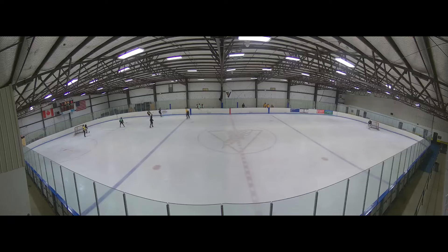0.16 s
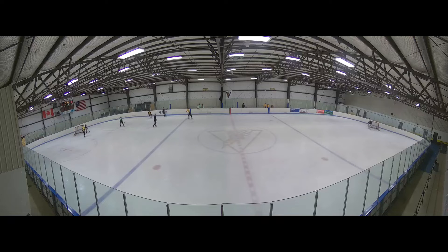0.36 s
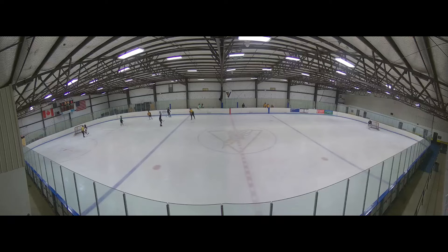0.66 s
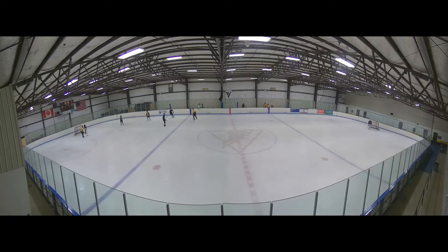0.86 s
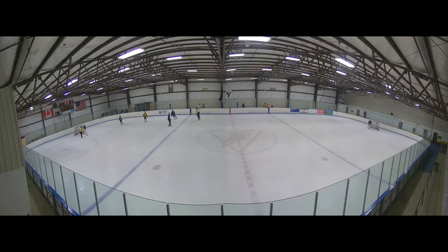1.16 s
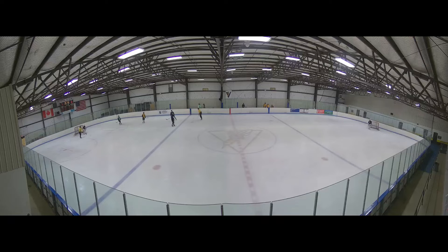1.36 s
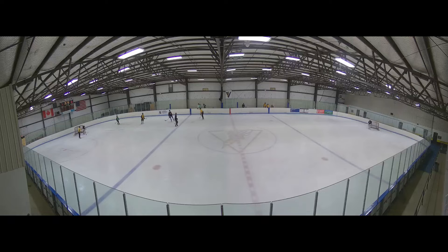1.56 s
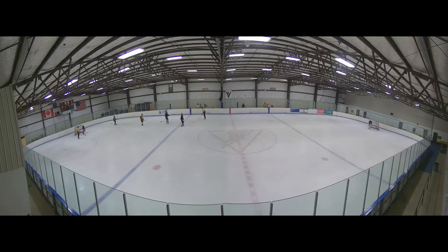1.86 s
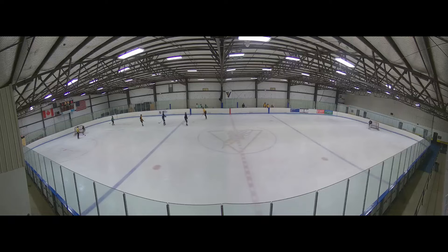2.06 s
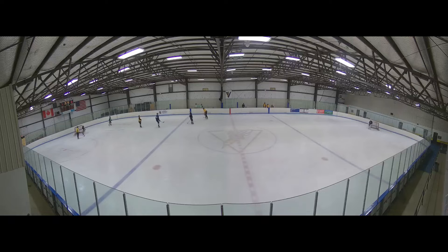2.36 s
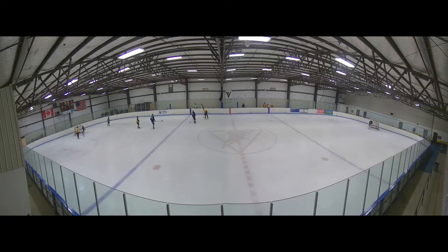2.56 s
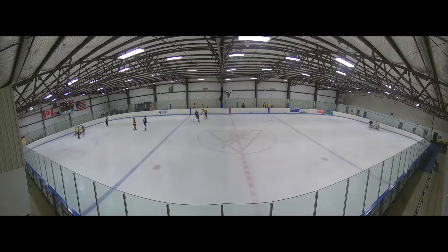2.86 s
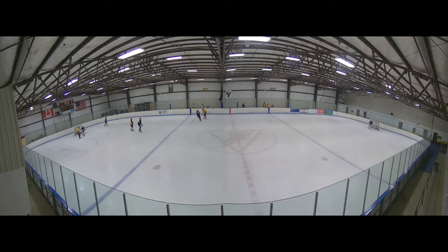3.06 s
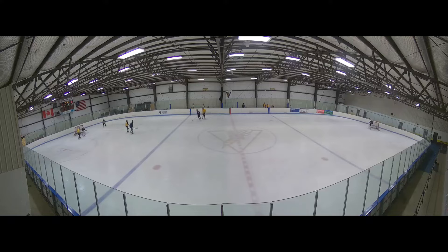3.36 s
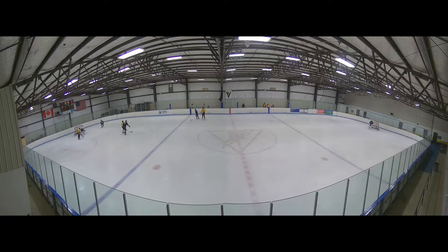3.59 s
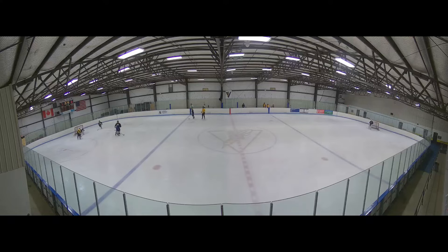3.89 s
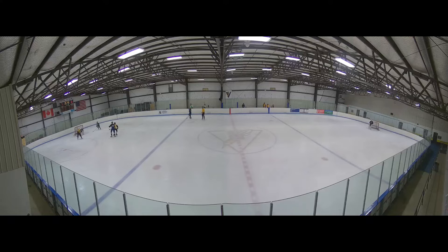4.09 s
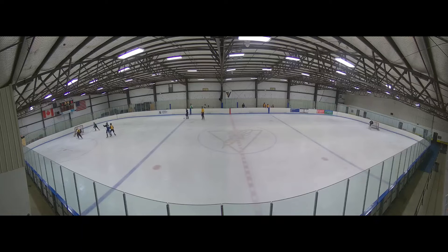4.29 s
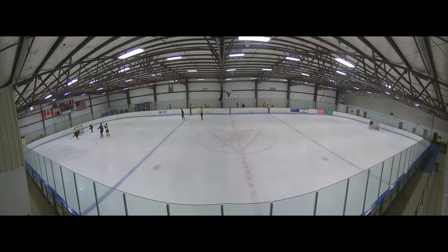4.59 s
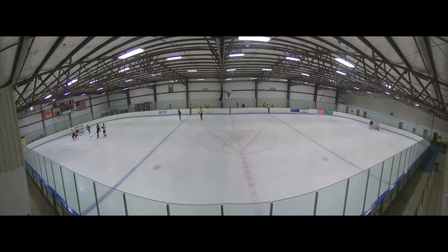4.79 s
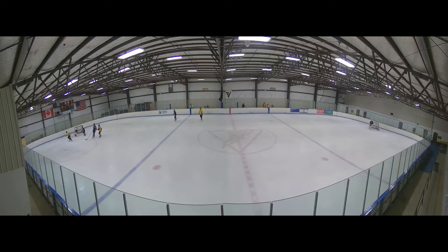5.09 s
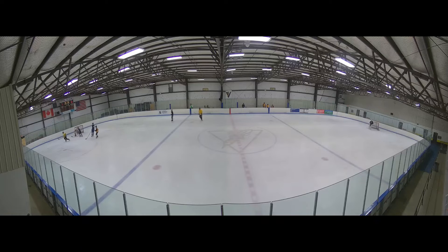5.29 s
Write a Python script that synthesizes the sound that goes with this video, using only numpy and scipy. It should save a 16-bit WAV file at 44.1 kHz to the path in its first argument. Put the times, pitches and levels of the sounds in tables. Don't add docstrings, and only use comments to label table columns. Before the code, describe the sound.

A distant camera microphone hears hockey play in a large, very reverberant indoor rink. Low ventilation rumble, faint hum and soft hiss run throughout. A short crack opens the clip, with lighter taps at about 0.4 and 0.5 seconds. A harder ringing knock lands at 0.8, echoing off boards and glass. A bright tick at 1.2 precedes a sharp crack at 1.3 with a flurry of slap echoes and a crunchy skate dig around 1.4. Smaller knocks follow at 1.9, 2.05, 2.4 and 2.6, with faint blade scraping. At 2.8 a heavy, broad bang booms off the boards, and its long tail fades through a quieter stretch until about 4.4. Faint taps and soft skate scrapes return, brightest near 4.9, then a light tap at 5.1 and a loud, abrupt crack at 5.27 near the end. Treble is dull, slightly grainy, and dips briefly around hits.

```python
import sys
import numpy as np
from scipy import signal
from scipy.fft import dct
from scipy.io import wavfile
from scipy.ndimage import uniform_filter1d

SR = 44100
rng = np.random.default_rng(int(sys.argv[2]) if len(sys.argv) > 2 else 0)


def invert_db(level):
    return 10 ** (np.asarray(level, dtype=float) / 20)


def bounce(signal):
    frames = np.transpose(np.atleast_2d(signal))
    limited = np.clip(frames, -1, 1)
    pcm = np.round(limited * 32767).astype(np.int16)
    wavfile.write(sys.argv[1], SR, pcm)


N = 239897
STEP = 32

# (time [s], peak level [dB], crack [Hz], width [octaves], hall tail level [dB])
BLOWS = [(.001, -17.5, 1308, 2.44, -45.5), (.363, -20.5, 2196, 1.1, -46), (.471, -25, 1240, 1.72, -46.5),
         (0.791, -15, 1450, 1.55, -30.5), (1.3291, -14.5, 2930, 2.57, -34.5), (1.884, -21, 2283, 1.2, -45),
         (2.047, -17, 1286, 1.9, -33.5), (2.388, -21.5, 1880, 1.34, -45), (2.587, -24, 1485, 1.5, -49.5),
         (2.798, -7, 918, 4.4, -23.5), (4.409, -30, 900, 1.12, -56), (4.531, -25.5, 1377, 1.8, -52.5),
         (5.135, -25, 1514, 2.16, -46.5), (5.2688, -5.2, 1896, 1.35, -32)]
# (time [s], peak level [dB], crack [Hz])
SLAPS = [(0.021, -26, 1180), (0.8105, -14.5, 2250), (0.811, -19, 800), (0.823, -17, 1200),
         (0.849, -20, 1480), (0.891, -16, 651), (0.901, -18, 1700), (1.003, -18, 1550), (1.332, -17, 1100),
         (1.36, -19, 2390), (1.378, -14, 2350), (1.388, -13, 2390), (1.394, -16, 2790), (1.404, -16, 2470),
         (1.421, -21, 1270), (2.06, -16.5, 1150), (2.114, -16, 1420), (2.129, -17, 1420),
         (2.771, -21.5, 1070), (2.7995, -9, 900), (2.805, -11, 1300), (2.812, -14, 800), (2.847, -16, 1090),
         (2.867, -11, 600), (2.882, -17, 1500), (4.879, -26, 1970), (4.959, -25, 1350), (5.271, -15, 3100),
         (5.282, -18, 2240)]
# (time [s], peak level [dB], crack [Hz], width [octaves])
BRIGHT_TICK = (1.2, -13, 5600, 2)
# (time [s], rms level [dB], centre [Hz], width [octaves], T60 [s])
CLUSTERS = [(0.796, -35.5, 1520, 0.3, 3.14), (0.8, -39, 2500, 0.8, 2.5), (0.81, -40, 1230, .3, 1.5),
            (.89, -38.5, 662, 0.36, 0.25), (1.36, -33, 2780, 1, 0.61), (2.8, -30.5, 520, 1.1, 1.5),
            (2.8, -35, 5300, .8, 0.95), (2.8, -34.5, 151, 0.88, 1.2), (5.271, -28.5, 1900, 1.55, 0.33),
            (5.271, -33, 2250, .3, .6), (5.271, -35, 900, .4, .4), (5.27, -42, 6000, .3, .3),
            (5.274, -41.5, 400, 0.56, 0.65)]
# (peak time [s], level [dB], rise [s per 10 dB], fall [s per 10 dB], brightness [dB/octave])
SKATES = [
    (0, -46.5, 0, .5, -8),
    (.4, -51, .5, 0.06, 4.5),
    (1.39, -29, 0.05, .07, .5),
    (1.52, -36, 0.34, 0.25, 2.5),
    (2.25, -43.5, 0.65, 0.2, .6),
    (2.6, -42, 0.15, 0.06, 1.1),
    (4.74, -43.5, .17, 0.26, .4),
    (4.88, -38.5, 0.06, 0.14, 0.8),
    (5.14, -46.5, 0.7, 0.5, -2),
]
# (frequency [Hz], density [dB per Hz])
BLADE = [(300, -25.5), (600, -6), (1200, 9.5), (2400, 5), (3500, -0.5), (5000, -16.5), (7500, -17)]
# (frequency [Hz], T60 [s])
HALL_T60 = [(100, 2.3), (300, 6.2), (800, 3.11), (2000, 2.07), (4000, 2.74), (7000, 1.21)]
# (frequency [Hz], level [dB])
HALL_COLOUR = [(100, 4.5), (300, 6), (800, 2.5), (2000, 0.66), (4000, -2.5), (7000, 5)]
# (frequency [Hz], density [dB per Hz])
AIR = [(20, 0.2), (45, -9.5), (120, -15), (200, -11.5), (350, -25), (600, -18.5), (2100, -27), (3300, -38)]
# (frequency [Hz], rms level [dB])
HUM = [(118.4, -54)]
# (start [s], end [s], cut [Hz], loss above it [dB])
DROPOUTS = [(.735, .845, 4800, -40), (1.298, 1.322, 2800, -30), (2.772, 2.788, 2100, -50),
            (2.788, 2.794, 600, -30), (2.952, 2.97, 10, -6), (5.2, 5.256, 4300, -40),
            (5.262, 5.274, 3750, -6)]
BLINKS = [.526, 3.895, 4.283, 4.687, 5.029, 5.071, 5.114]
# (frequency [Hz], step [share of local rms])
COARSENESS = [(100, .8), (600, 1.2), (1500, 1.5), (3000, 2.1), (4500, 3.0), (6000, 3.9), (7200, 4.6)]

RATTLE = .05
BOOM_HZ, BOOM_OCTAVES = 227, 2.8
BOOM_DB, BOOM_DB_PER_OCTAVE, HEAVY_OCTAVES = -33, 9, 2.6
SLAP_OCTAVES = .7
GLIDE_DB = -60
AIR_DB = -43
FRAME, FIRST = 2822, 573
SHORT_BEFORE_S, SHORT_AFTER_S = .01, .018
BLINK_S, BLINK_HZ, BLINK_DB = .009, 2700, -13
CUTOFF_HZ = 8170


def rms_one(x):
    return x / np.sqrt(np.mean(x ** 2) + 1e-20)


def at_hz(points, hz):
    table_hz, values = np.transpose(points)
    return np.interp(np.log(hz + 1e-9), np.log(table_hz), values)


def smooth(control):
    return np.interp(np.arange(N) / STEP, np.arange(len(control)), control)


def drift(rate_hz):
    r = np.exp(-2 * np.pi * STEP * rate_hz / SR)
    noise = rng.standard_normal(N // STEP + 2001)
    return rms_one(signal.lfilter([1], [1, -2 * r, r * r], noise)[2000:])


def band(x, hz, octaves):
    half = 2 ** (np.clip(octaves, .15, 4) / 2)
    edges = [hz / half, min(hz * half, .45 * SR)]
    return signal.sosfilt(signal.butter(2, edges, "band", fs=SR, output="sos"), x)


def bank(sources, gain_db, first=0):
    out = np.zeros(N)
    centres = 20 * 2 ** np.arange(0, 8.8, .5)
    for k, hz in enumerate(centres[first:]):
        out += smooth(invert_db(gain_db(hz))) * band(sources[k % 2], hz, 0.45)
    return out


def add(track, s, sound):
    at = max(round(s * SR), 0)
    track[at:at + len(sound)] += sound[:N - at]


def crack(hz, octaves, rattle, t60, noise):
    push = rattle * noise * invert_db(-60 * np.arange(len(noise)) / SR / t60) + 1e-18
    push[0] = -1
    pulse = band(band(push, hz, octaves), hz, octaves + 1.2)
    return pulse / np.max(np.abs(pulse))


def blows():
    direct, send = np.zeros(N), np.zeros(N)
    noises = rng.standard_normal((len(BLOWS), 2048))
    for (s, peak_db, hz, octaves, hall_db), noise in zip(BLOWS, noises):
        weight = min(octaves, HEAVY_OCTAVES)
        add(direct, s, invert_db(peak_db) * crack(hz, weight, RATTLE, .03, noise))
        boom_db = hall_db + BOOM_DB + BOOM_DB_PER_OCTAVE * weight
        boom = invert_db(boom_db) * rms_one(crack(BOOM_HZ, BOOM_OCTAVES, .008, .02, noise))
        add(direct, s, 0.19 * boom)
        hall_crack = rms_one(crack(hz, octaves + 0.98, RATTLE / 2, .005, noise))
        add(send, s, invert_db(hall_db) * hall_crack + boom)
    return direct, send


def slaps():
    rows = [(*slap, SLAP_OCTAVES) for slap in SLAPS] + [BRIGHT_TICK]
    out, noises = np.zeros(N), rng.standard_normal((len(rows), 1024))
    for (s, peak_db, hz, octaves), noise in zip(rows, noises):
        add(out, s + .0005, invert_db(peak_db - 3) * crack(hz, octaves, .2, .012, noise))
    return out


def clusters():
    out, t = np.zeros(N), np.arange(SR) / SR
    noises = rng.standard_normal((len(CLUSTERS), SR))
    for (s, level_db, hz, octaves, t60), noise in zip(CLUSTERS, noises):
        envelope = invert_db(level_db - 60 * t / t60) * (1 - np.exp(-t / 0.003))
        add(out, s, rms_one(band(noise, hz, octaves)) * envelope)
    return out


def skates():
    s, peak_db, rise_s, fall_s, bright_db = np.transpose(SKATES)[:, :, None]
    t = np.arange(0, N, STEP) / SR - s
    fade = np.where(t < 0, -t / rise_s, t / fall_s)
    power = invert_db(2 * (peak_db - 10 * fade))
    total = power.sum(axis=0) + invert_db(2 * GLIDE_DB)
    tilt_db = (power * bright_db).sum(axis=0) / total
    chips = rng.standard_normal((2, N)) * invert_db(3.0 * np.minimum(rng.exponential(1, N), 5))
    hiss = bank(chips, lambda hz: at_hz(BLADE, hz) + tilt_db * np.log2(hz / 2000), first=6)
    flutter = invert_db(1.5 * drift(25)[:len(total)])
    return smooth(np.sqrt(total) * flutter) * rms_one(hiss)


def hall(x):
    t = np.arange(N // STEP + 1) * STEP / SR
    lumps_db = 1.5 * drift(40) * np.exp(-t / .2)
    early = invert_db(lumps_db + 1.7 * np.exp(-t / 0.15)) * (1 - np.exp(-t / .008))
    noise = rng.standard_normal((2, N)) * smooth(early)
    tail = bank(noise, lambda hz: at_hz(HALL_COLOUR, hz) - 60 * t / at_hz(HALL_T60, hz), first=4)
    return signal.fftconvolve(x, tail / np.sqrt(np.sum(tail ** 2)))[:N]


def ventilation():
    noise, t = rng.standard_normal((2, N)), np.arange(N) / SR
    hum = np.zeros(N)
    for hz, level_db in HUM:
        hum += smooth(invert_db(level_db + 2.6 * drift(2.6))) * np.sin(2 * np.pi * hz * t)
    air = bank(noise, lambda hz: at_hz(AIR, hz) + 2.1 * drift(7.8))
    return hum + invert_db(AIR_DB) * rms_one(air)


def scene():
    direct, send = blows()
    scrape = skates()
    near = direct + slaps() + clusters() + scrape
    return (near + hall(send + invert_db(-3.5) * scrape) + ventilation())[None]


def coarse_spectrum(x, size, coarse, top_hz):
    count, half = N // FRAME * FRAME // size + 3 * FRAME // size, size // 2
    padded = np.pad(x, (size + FRAME - FIRST, (count + 2) * size))
    window = np.sin(np.pi * (np.arange(2 * size) + .5) / (2 * size))
    frames = padded[np.arange(count)[:, None] * size + np.arange(2 * size)] * window
    a, b, c, d = np.split(frames, 4, axis=1)
    lines = dct(np.hstack([-c[:, ::-1] - d, a - b[:, ::-1]]), type=4, norm="ortho")

    hz = (np.arange(size) + .5) * SR / 2 / size
    local_rms = np.sqrt(uniform_filter1d(lines ** 2, size=size // 70, axis=1) + 1e-16)
    step = coarse * at_hz(COARSENESS, hz) * local_rms
    uneven = invert_db(2.0 * rng.standard_normal((count, 70)))
    step = step * uneven[:, np.arange(size) * 70 // size]
    top = top_hz - 250 * rng.exponential(1, (count, 1))
    rounded = np.round(lines / step) * step * (hz < top)

    back = dct(rounded, type=4, norm="ortho")
    low, high = back[:, :half], back[:, half:]
    frames = np.hstack([high, -high[:, ::-1], -low[:, ::-1], -low]) * window
    out = frames[1:, :size] + frames[:-1, size:]
    return out.ravel()[FRAME - FIRST:][:N]


def camera_frames(x):
    t = np.arange(0, N, STEP) / SR
    short = np.zeros(len(t))
    for start, end, *_ in DROPOUTS:
        inside_s = np.minimum(t - start + SHORT_BEFORE_S, end + SHORT_AFTER_S - t)
        short = np.maximum(short, np.clip(inside_s / 0.045 + .5, 0, 1))
    short = smooth(short)
    long_frames = coarse_spectrum(x, size=FRAME, coarse=1, top_hz=7400)
    short_frames = coarse_spectrum(x, size=FRAME // 16 * 2, coarse=.55, top_hz=7260)
    return (1 - short) * long_frames + short * short_frames


def upper_dropouts(x):
    hz, t, lines = signal.stft(x, SR, nperseg=256, noverlap=128)
    level_db = 0
    blinks = [(s - BLINK_S / 2, s + BLINK_S / 2, BLINK_HZ, BLINK_DB) for s in BLINKS]
    for start, end, cut_hz, loss_db in [*DROPOUTS, *blinks]:
        inside = np.clip(np.minimum(t - start, end - t) / .003 + .5, 0, 1)
        above = np.clip((hz - cut_hz) / 300, 0, 1)
        level_db = level_db + np.outer(loss_db * above, inside)
    return signal.istft(lines * invert_db(level_db), SR, nperseg=256, noverlap=128)[1][:N]


def roll_off(x):
    return signal.sosfilt(signal.butter(12, 7670, fs=SR, output="sos"), x)


def record(dry):
    heard = upper_dropouts(camera_frames(dry[0]))
    top_cut = signal.cheby2(14, 80, CUTOFF_HZ, fs=SR, output="sos")
    mix = signal.sosfilt(top_cut, heard)[None]
    return roll_off(mix)


dry = scene()
out = record(dry)
bounce(out)
```